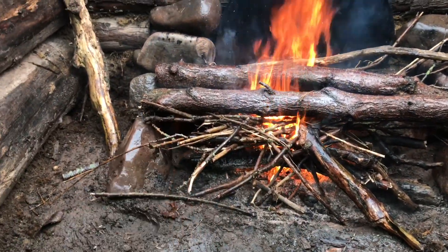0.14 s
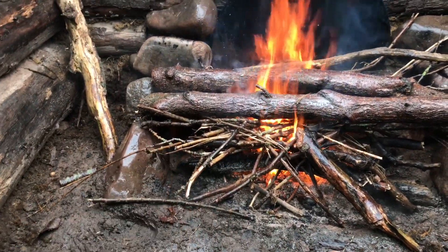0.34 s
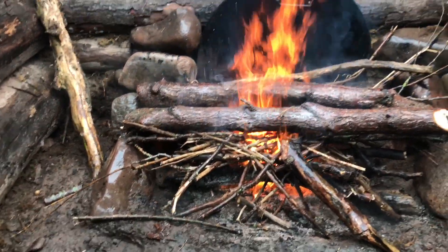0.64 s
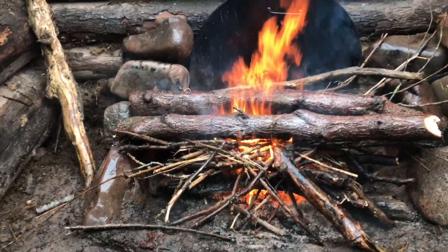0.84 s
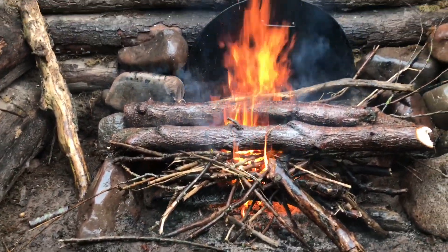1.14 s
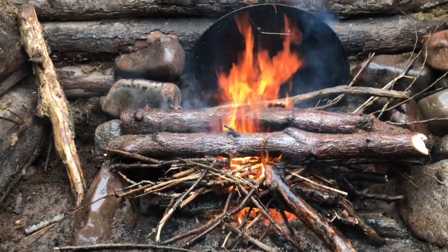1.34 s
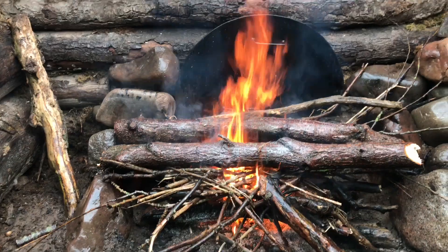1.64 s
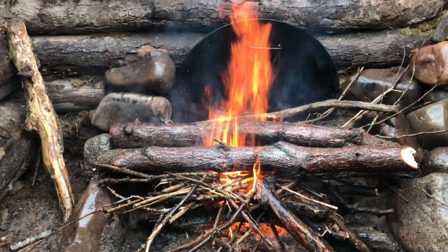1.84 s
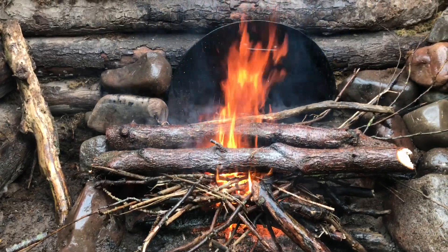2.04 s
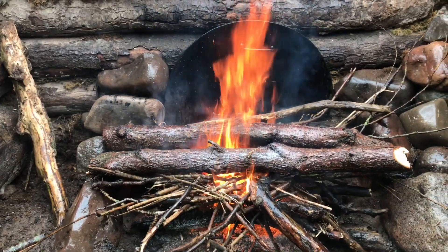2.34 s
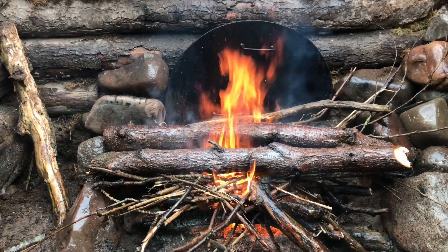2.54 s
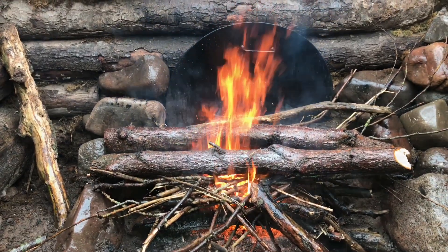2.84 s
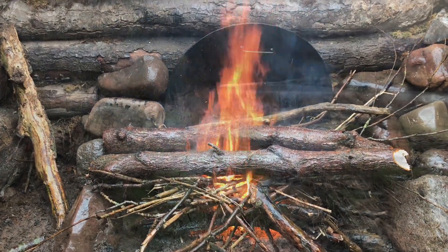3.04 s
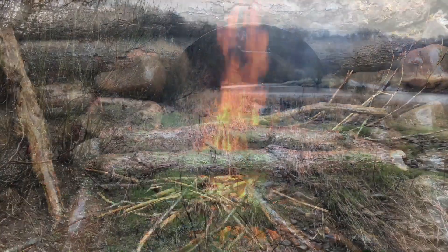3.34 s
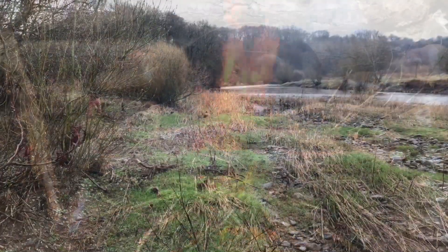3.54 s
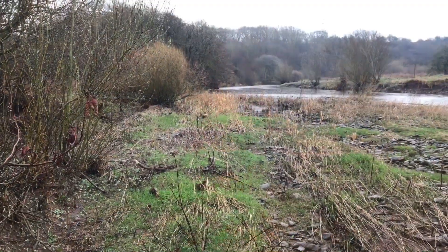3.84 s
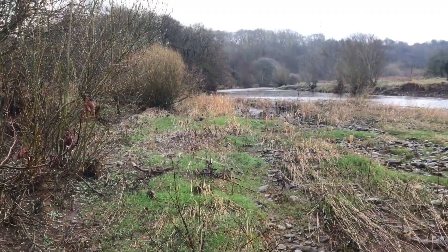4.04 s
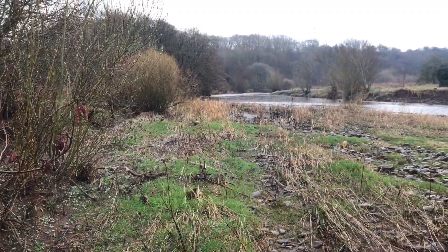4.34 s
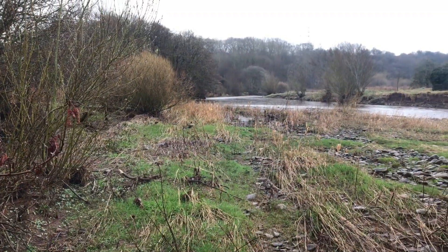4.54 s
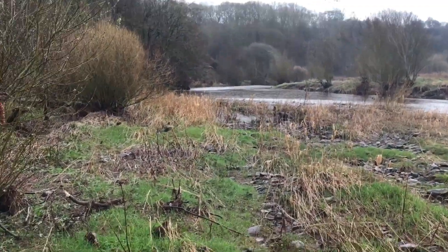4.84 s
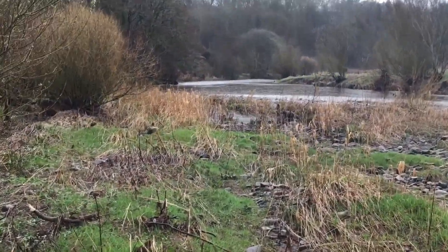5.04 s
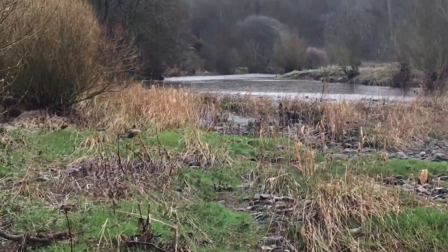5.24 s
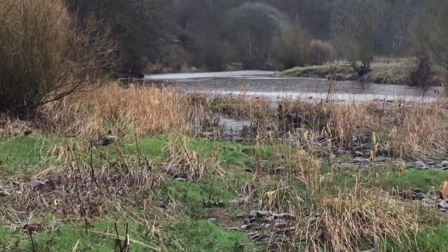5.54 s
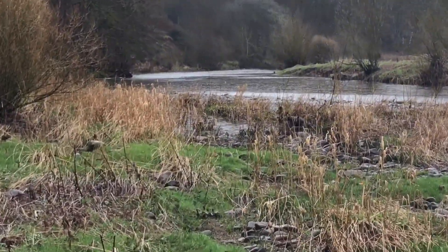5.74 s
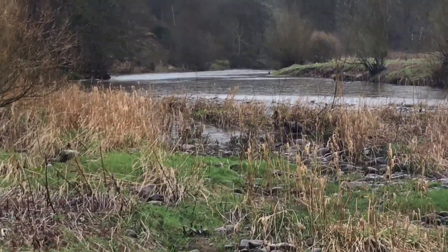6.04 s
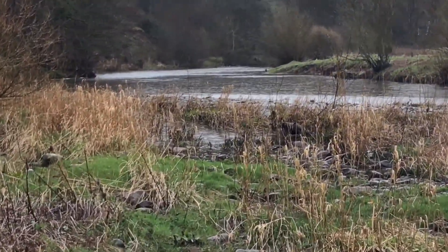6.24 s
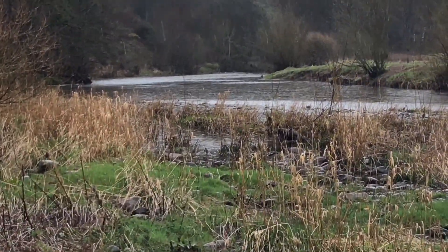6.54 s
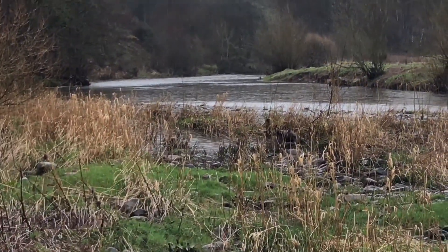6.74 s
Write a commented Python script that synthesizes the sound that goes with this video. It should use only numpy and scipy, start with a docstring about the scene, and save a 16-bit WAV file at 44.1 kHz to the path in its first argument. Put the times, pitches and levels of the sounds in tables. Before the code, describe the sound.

Dense tarp patter and sharp campfire pops over a low flame rumble, melting into a quiet river bank with soft ticking drops and thin birdsong.

```python
"""Rain taps on a tarp close overhead, over a camp fire: wet twigs pop and crackle and the flames rumble.
Drops are short falling chirps with a low thump, pops are ringing cracks with noisy tails; patter and flames
are shaped noise, and a far hum wavers as a sine. The camp then fades over to an open river bank: faint rain
hiss, single drops ticking near the microphone (short rings) and a thin bird song (gliding sines)."""
import sys
import numpy as np
from scipy import signal
from scipy.io import wavfile
from scipy.ndimage import uniform_filter1d

SR = 44100
rng = np.random.default_rng(int(sys.argv[2]) if len(sys.argv) > 2 else 0)


def makeup_ratio(level_db):
    """Linear amplitude ratio for a level in decibels (20 dB per factor of ten)."""
    decades = np.asarray(level_db, float) / 20
    return 10 ** decades


def store_wav(level_fs):
    """Save 16-bit WAV to argv[1]."""
    pcm = np.round(np.clip(np.atleast_2d(level_fs), -1, 1) * 32767)
    wavfile.write(sys.argv[1], SR, pcm.T.astype(np.int16))


N = 304290

# larger drops on the tarp: start_s, ripple_peak_db, thump_db (against the ripple), ripple_pitch_khz
TARP_DROPS = [(0.1119, -21, -38, 1.7), (0.123, -36, -23, 1.6), (0.1517, -23.5, -9, 1.66),
              (0.236, -25.5, -23, 1.7), (0.2572, -18.5, -13.5, 1.16), (0.3272, -19, -9, 1.5),
              (0.4607, -21.5, -4.5, 1.65), (0.489, -25.5, -14, 2.0), (0.5321, -22.5, -29, 1.4),
              (0.6146, -25, -20, 2.2), (0.6835, -15, -5, 1.6), (0.7903, -22, -10.5, 1.45),
              (0.837, -23, -24, 1.27), (0.8894, -25.5, -22, 1.2), (0.9064, -31, -10, 1.2),
              (0.9647, -24.5, -21, 1.67), (1.0087, -26, -10, 1.64), (1.032, -25, -4.5, 1.14),
              (1.0556, -24, -13, 0.91), (1.101, -24.5, -4.5, 0.94), (1.2179, -24.5, -25, 1.33),
              (1.2573, -24, -29, 1.38), (1.2949, -18.5, -17, 1.46), (1.3493, -25, -14, 2.3),
              (1.3407, -25.5, -17, 1.21), (1.41, -31.5, -23, 1.2), (1.523, -23, -17, 1.4),
              (1.5413, -22.5, -18, 1.36), (1.5578, -20, -17, 1.57), (1.6582, -24.5, -24, 1.37),
              (1.7359, -24, -3, 2.3), (1.8053, -25, -16, 2.1), (1.8625, -23, -12, 1.93),
              (1.9911, -25.5, -23, 1.2), (2.0468, -25, -11, 2.2), (2.103, -16, -9.5, 1.47),
              (2.1404, -24.5, -14, 1.86), (2.1742, -26, -17, 1.4), (2.1892, -31, -4, 1.5),
              (2.3585, -23, -18, 1.9), (2.392, -28.5, -18, 1.54), (2.4302, -23, -21, 1.474),
              (2.6122, -29, -12, 1.3), (2.648, -26, -16, 1.44), (2.678, -24.5, -4.5, 1.53),
              (2.6982, -28, -12, 1.48), (2.792, -24, -12.5, 1.95), (2.8495, -21.5, -17, 1.14),
              (2.9068, -22, -13, 1.52), (2.9256, -25, -20, 1.3), (2.9692, -27, -27, 1.8),
              (3.0411, -27, -22, 1.35), (3.0832, -26, -9.5, 1.2), (3.228, -34, -18, 1.1),
              (3.2809, -30, -24, 1.33), (3.3031, -20.5, -8.5, 1.53), (3.3228, -41, -11, 1.14),
              (3.3464, -29.5, -26, 1.34), (3.4923, -34, -12, 0.93), (3.6182, -34.5, -5, 0.97),
              (3.6882, -37, -22, 1.55), (3.71, -37.5, -14, 1.6)]
# camp loudness that its layers are set against, fading out: time_s, level_db
CAMP_LEVEL = [(0.0, -45.5), (2.79, -45), (3.3, -51.5), (3.73, -59), (3.85, -70.5)]
# spectrum of the far rain at the camp: frequency_hz, relative_density_db
PATTER_SPECTRUM = [(60, -21), (110, 3), (240, -16), (365, -16), (500, -15), (1230, -10), (2500, -14.5),
                   (3900, -15.5), (4900, -20), (6000, -17.5), (9300, -21), (10500, -29.5), (13500, -35),
                   (15000, -35.5), (16200, -46)]
# spectrum of the flame rumble: frequency_hz, relative_density_db
FLAME_SPECTRUM = [(16, -46), (28, -18), (45, 0.5), (65, 9.5), (92, -6.5), (124, 0.5), (145, -3), (200, -15),
                  (260, -47), (440, -120)]
# spectrum of pops and crackle: frequency_hz, relative_density_db
POP_SPECTRUM = [(880, -25.5), (1500, -15), (1810, -26.5), (2100, -5.5), (2720, -7.5), (3730, -1.5),
                (4830, -5.5), (5540, 1.5), (8160, 1.5), (10500, -3.5), (14900, -9.5), (16000, -6.5)]
# pops of the twigs: start_s, peak_db, second_crack_db (against the first), second_delay_ms, crack_pitch_khz
TWIG_POPS = [(0.01, -20, -10, 1.0, 8.7), (0.1288, -32, -2, 1.0, 9.9), (0.2153, -20.5, -12, 1.9, 8.6),
             (0.3286, -25.5, -11, 1.2, 5.8), (0.6834, -17, -9, 1.4, 6.5), (0.7192, -23, 7, 1.9, 8.5),
             (0.79, -26.5, -2, 1.0, 7.5), (0.8323, -28, -9, 4.3, 4.3), (0.9829, -4, -1, 2.0, 8.8),
             (1.101, -30, -16, 3.7, 5.5), (1.2562, -33, -15, 1.3, 6.8), (1.349, -19.5, -7, 2.4, 10.8),
             (1.509, -27, -11, 1.7, 13), (1.524, -27, -4, 4.1, 5.1), (1.6212, -19.5, 3.5, 2.4, 8.9),
             (1.7774, -24.5, -2.5, 1.0, 9), (2.028, -18.5, -0.5, 2.0, 9.2), (2.1021, -19.5, 0, 1.7, 6.9),
             (2.3472, -7.5, 1.5, 1.8, 10.7), (2.612, -25.5, -8, 1.9, 6.2), (2.6808, -29.5, -4, 4.5, 6.3),
             (2.7319, -29, -5, 1.2, 4.4), (2.8491, -31, -10, 1.8, 3.2), (2.9347, -3.5, -8, 2.4, 9.6),
             (3.085, -30, -15, 1.0, 4.1), (3.2466, -5.5, 2, 1.3, 8.43), (3.395, -38, 5, 2.5, 7),
             (3.446, -11, 1, 1.3, 8.9), (3.4875, -38, -6, 1.0, 5), (3.5385, -24, -13, 1.7, 9.2)]
# far hum: time_s, pitch_hz, level_db
HUM_CURVE = [(1.05, 117.8, -62), (1.4, 120, -47), (1.94, 119.2, -54.5), (2.2, 117.9, -52.5),
             (2.67, 118.4, -43.5), (2.8, 117, -64)]
# bank loudness, fading in: time_s, level_db
BANK_LEVEL = [(2.9, -87), (3.2, -86), (3.55, -59), (3.8, -54), (6.9, -54)]
# spectrum of the wide rain hiss at the bank: frequency_hz, relative_density_db
BANK_SPECTRUM = [(16, -56), (28, -27.5), (53, 2), (77, 0), (131, -11.5), (234, -16.5), (578, -17.5),
                 (1910, -28), (3170, -28), (4970, -33), (5990, -30), (8460, -30), (10500, -40),
                 (14800, -40.5), (16000, -47)]
# drops near the microphone on the bank: start_s, peak_db, ring_pitch_khz
NEAR_DROPS = [(3.8656, -50, 3.0), (3.941, -54, 7), (4.078, -47, 4.2), (4.112, -48, 2.5), (4.126, -45, 3.4),
              (4.1454, -44, 8.3), (4.199, -52, 9.1), (4.2901, -47, 6.8), (4.3888, -46, 6.5),
              (4.4242, -37.5, 3.3), (4.468, -46, 3.3), (4.4949, -47, 4.6), (4.5247, -44, 4),
              (4.7, -48, 1.5), (4.762, -44, 2.5), (4.799, -42, 8), (4.8617, -40.5, 1.28),
              (4.969, -46, 1.55), (4.975, -41, 4.3), (5.007, -49, 4.6), (5.0185, -46, 5.8),
              (5.141, -49, 2.4), (5.4884, -48, 1.4), (5.773, -43, 3.8), (5.8681, -46, 3.9),
              (6.102, -42.5, 4.2), (6.1518, -46, 6.3), (6.175, -45, 8), (6.3059, -45, 6.5),
              (6.3835, -45, 8.1), (6.4165, -49, 2.5), (6.626, -43, 5.5), (6.7662, -38, 3),
              (6.7974, -39.5, 2.3)]
# notes of the bird: start_s, length_s, first_pitch_hz, last_pitch_hz, level_db
BIRD_NOTES = [(3.68, 0.083, 7200, 7550, -67), (3.74, 0.045, 7100, 7090, -70),
              (3.762, .022, 5500, 4400, -69), (3.795, .04, 4850, 4630, -71), (4.01, 0.19, 7100, 6980, -69),
              (4.105, 0.033, 6800, 4280, -66), (4.14, 0.047, 3550, 3400, -68),
              (4.197, .022, 7050, 7450, -71), (4.208, 0.095, 7480, 7500, -64),
              (4.455, .018, 4900, 3600, -69), (4.345, 0.16, 7200, 7270, -68), (4.54, .05, 5200, 5150, -79)]

# middling tarp drops at random: centre above the camp level, spread either way, thump against the ripple
MIDDLING_COUNT, MIDDLING_DB, MIDDLING_SPREAD_DB = 46, 15, 4
MIDDLING_THUMP_DB, MIDDLING_KHZ = -11.5, 1.393
# middle of the thump scale (a thump starts at 0.875 of its scale), log spread from spot to spot
THUMP_SCALE_HZ, THUMP_SPREAD = 399, 0.12
FLAMES_DB = 2.04  # against the camp level
# tail of a pop against its first crack, and its rise per dB of the second crack
TAIL_DB, TAIL_DB_PER_SECOND_DB = -17, 0.57
# knock of the log against the louder crack
KNOCK_DB, KNOCK_KHZ, KNOCK_DELAY_S = -15, 3.66, 0.00049
# small ticks at random: lowest peak against the bank level, pitch range
SMALL_COUNT, SMALL_DB, SMALL_LOW_KHZ, SMALL_HIGH_KHZ = 70, 0, 2.8, 9.8
# ring decay of a tick in cycles but no shorter than the least, onset time, snap against the ring
RING_CYCLES, RING_LEAST_MS, SOFT_MS, SNAP_DB = 1.24, 0.31, 0.06, -3.5
WAVER_HZ, WAVER_DB = 25, 1.5  # unsteadiness of the bird notes
OVERLOAD, EDGE_HZ = 0.8, 15900  # peak ceiling in full scale, upper band limit


def evened(x):
    """Scales to rms 1."""
    return x / np.sqrt(np.mean(x ** 2) + 1e-20)


def peaked(x):
    """Scales to peak 1."""
    return x / np.max(abs(x))


def camp_level():
    """Camp level in dB at every sample, all but silent past the end of its curve."""
    time_s, level_db = np.transpose(CAMP_LEVEL)
    return np.interp(np.arange(N) / SR, time_s, level_db, right=-150)


def add(mix, start_s, sound):
    """Mixes a sound in at start_s."""
    part = mix[max(round(start_s * SR), 0):][:len(sound)]
    part += sound[:len(part)]


def falls(per_s, spread_db, clumpy):
    """A sparse train of random hits that come in clumps; a few are large."""
    clumps = np.exp(clumpy * evened(uniform_filter1d(rng.standard_normal(N), size=1500)))
    hit = rng.random(N) < per_s / SR * clumps / clumps.mean()
    return makeup_ratio(spread_db * np.minimum(rng.exponential(1, N), 3)) * hit


def ripple(khz, glide_ms, fade_ms):
    """A struck sheet sends its treble first: a short chirp that falls through the given pitch."""
    ms = np.arange(900) / SR * 1000
    turns = 2.316 * khz * glide_ms * np.log(1 + ms / glide_ms)
    return peaked(-np.sin(2 * np.pi * turns) * np.exp(-ms / fade_ms))


def shower(per_s, spread_db, low_hz, high_hz, glide_ms, fade_ms):
    """Random drops, each a ripple at one of twelve pitches; a few are large."""
    size = falls(per_s, spread_db, clumpy=0.6)
    kind = rng.integers(0, 12, N)
    pitches = np.geomspace(low_hz, high_hz, 12) / 1000
    return evened(sum(signal.oaconvolve(size * (kind == k), ripple(khz, glide_ms, fade_ms))[:N]
                      for k, khz in enumerate(pitches)))


def shelter(x, t60, first_ms):
    """Surroundings answer with sparse, decaying echoes of random sign; three sets take turns."""
    t, out = np.arange(N) / SR, np.zeros(N)
    for k in range(3):
        taps = np.zeros(6000)
        at = np.arange(0, 5980, 20) + rng.integers(0, 20, 299)
        late = at > first_ms * SR / 1000
        taps[at] = rng.standard_normal(299) * makeup_ratio(-60 * at / SR / t60) * late
        turn = np.cos(np.pi * (t * 7 + k / 3)) * np.sqrt(2 / 3)
        out += signal.oaconvolve(x * turn, taps / np.linalg.norm(taps))[:N]
    return out


def middling_drops():
    """Random tarp drops that follow the camp level, in the columns of TARP_DROPS."""
    when, size, low, pitch = rng.random((MIDDLING_COUNT, 4)).T
    start_s = when * CAMP_LEVEL[-1][0]
    peak_db = np.interp(start_s, *np.transpose(CAMP_LEVEL)) + MIDDLING_DB
    peak_db += MIDDLING_SPREAD_DB * (2 * size - 1)
    thump_db = MIDDLING_THUMP_DB + 5 * (2 * low - 1)
    return np.c_[start_s, peak_db, thump_db, MIDDLING_KHZ * (0.8 + 0.4 * pitch)]


def tarp():
    """Large drops overhead, each a ripple and the low thump of the sheet, over a shower of small ones."""
    small = shower(600, 4.7, 460, 3070, glide_ms=0.45, fade_ms=0.61)
    mix = makeup_ratio(camp_level() - 9.5) * small
    drops, t = np.r_[TARP_DROPS, middling_drops()], np.arange(1500) / SR
    spots = THUMP_SCALE_HZ * np.exp(THUMP_SPREAD * rng.standard_normal(len(drops)))
    sag = 0.028 * np.log(1 + t / 0.032)  # the pitch sinks as the sheet slackens
    for (start_s, peak_db, thump_db, khz), hz in zip(drops, spots):
        swell = 1 - np.exp(-t / 0.0005)
        thump = peaked(-np.sin(2 * np.pi * hz * sag) * np.exp(-t * hz / 0.61) * swell)
        add(mix, start_s, makeup_ratio(peak_db) * ripple(khz, glide_ms=0.32, fade_ms=0.99))
        add(mix, start_s, makeup_ratio(peak_db + thump_db) * thump)
    return mix + makeup_ratio(-3.5) * shelter(mix, t60=0.087, first_ms=0.73)


def hiss(spectrum, size, patchy_db, flicker_db):
    """Random short-time spectra with drifting patches and a flicker shared by all bands."""
    frames, hz = 4 * N // size + 5, np.fft.rfftfreq(size, 1 / SR)
    real, imaginary, patches = rng.standard_normal((frames, len(hz), 3)).T
    patches = uniform_filter1d(patches, size=9, axis=0)  # across frequency
    patches = evened(uniform_filter1d(patches, size=8, axis=1))  # across time
    flicker = evened(uniform_filter1d(rng.standard_normal(frames), size=4))
    point_hz, point_db = np.transpose(spectrum)
    shape_db = np.interp(np.log(hz + 1), np.log(point_hz), point_db)[:, None]
    z = (real + 1j * imaginary) * makeup_ratio(shape_db + patchy_db * patches + flicker_db * flicker)
    return evened(signal.istft(z, nperseg=size, noverlap=3 * size // 4)[1][:N])


def colour(spectrum, size):
    """Causal (minimum-phase) impulse response with the given spectrum."""
    point_hz, point_db = np.transpose(spectrum)
    hz = abs(np.fft.fftfreq(8192, 1 / SR))
    gain = makeup_ratio(np.interp(np.log(hz + 1), np.log(point_hz), point_db))
    log_gain = np.log(gain + 1e-5)
    return np.fft.ifft(np.exp(np.conj(signal.hilbert(log_gain)))).real[:size]


def grains(spectrum, per_s, spread_db, t60, tail_db):
    """Random single clicks of the given colour; each of 16 kinds drags its own short noisy tail."""
    size = falls(per_s, spread_db, clumpy=0.55)
    kind, t = rng.integers(0, 16, N), np.arange(3000) / SR
    tails = rng.standard_normal((16, len(t))) * makeup_ratio(-60 * t / t60)
    tails *= makeup_ratio(tail_db) / np.linalg.norm(tails, axis=1, keepdims=True)
    tails[:, 0] = 1  # the click itself
    hits = sum(signal.oaconvolve(size * (kind == k), tail)[:N] for k, tail in enumerate(tails))
    return evened(signal.oaconvolve(hits, colour(spectrum, size=2048))[:N])


def patter():
    """Far rain at the camp: a flickering hiss and a dense fall of single drops."""
    wash = makeup_ratio(camp_level() - 1.5) * hiss(PATTER_SPECTRUM, size=512, patchy_db=1.0, flicker_db=4)
    drops = grains(PATTER_SPECTRUM, 400, spread_db=4.5, t60=0.041, tail_db=4)
    return wash + makeup_ratio(camp_level() - 0.5) * drops


def flames():
    """Low, unsteady noise as the rumble of the flames."""
    rumble = hiss(FLAME_SPECTRUM, size=4096, patchy_db=-0.4, flicker_db=3.0)
    return makeup_ratio(camp_level() + FLAMES_DB) * rumble


def crackle():
    """Small random ticks of the fire with a short hissing tail."""
    ticks = grains(POP_SPECTRUM, 120, spread_db=3, t60=0.038, tail_db=3)
    return makeup_ratio(camp_level() - 17) * ticks


def twigs():
    """Steam bursts the wood in one or two cracks; the stones around throw back a hissing tail."""
    body, t = colour(POP_SPECTRUM, size=400), np.arange(6000) / SR
    mix, noise = np.zeros(N), rng.standard_normal((len(TWIG_POPS), len(t)))
    ms = 1000 * t[:400]
    rise = 1 - np.exp(-t / 0.001)
    for (start_s, peak_db, second_db, delay_ms, khz), puff in zip(TWIG_POPS, noise):
        ring = np.sin(2 * np.pi * khz * ms) * ms * np.exp(-ms * khz / 0.85)
        crack = peaked(peaked(ring) + makeup_ratio(1.5) * peaked(body))
        add(mix, start_s, -makeup_ratio(peak_db) * crack)
        # the second crack is a ragged cluster of splinters, begun 0.3 ms ahead of its delay
        splinters = signal.oaconvolve(puff[-400:] * np.exp(-ms / 1.9), crack + 0.83 * peaked(body))
        add(mix, start_s + delay_ms / 1000 - 0.0003, makeup_ratio(peak_db + second_db) * peaked(splinters))
        # uneven echoes: a wide quick part, and a longer part that keeps the pitch of the crack
        puff = puff * makeup_ratio(2.5 * evened(uniform_filter1d(puff[::-1], size=40)))
        quick = evened(signal.oaconvolve(puff, body)[:len(t)]) * makeup_ratio(-60 * t / 0.032)
        slow = evened(signal.oaconvolve(puff, crack)[:len(t)]) * makeup_ratio(-3 - 60 * t / 0.1)
        tail_db = peak_db + TAIL_DB + TAIL_DB_PER_SECOND_DB * second_db
        add(mix, start_s, makeup_ratio(tail_db) * rise * (quick + slow))
        # each pop also knocks the log
        knock_db = peak_db + max(second_db, 0) + KNOCK_DB
        add(mix, start_s + KNOCK_DELAY_S, makeup_ratio(knock_db) * ripple(KNOCK_KHZ, glide_ms=0.65, fade_ms=1.0))
    return mix


def tone(curve, taper):
    """A sine that follows a pitch and rms level curve; returns its start_s and its sound."""
    time_s, pitch_hz, level_db = np.transpose(curve)
    t = np.arange(time_s[0], time_s[-1], 1 / SR)
    wave = np.sqrt(2) * np.sin(2 * np.pi * np.cumsum(np.interp(t, time_s, pitch_hz)) / SR)
    fades = signal.windows.tukey(len(t), taper)
    return time_s[0], wave * makeup_ratio(np.interp(t, time_s, level_db)) * fades


def hum():
    """A far low sine that wavers in pitch and level."""
    mix = np.zeros(N)
    add(mix, *tone(HUM_CURVE, taper=0.075))
    return mix


def bank_rain():
    """Wide hiss of rain on grass and water, with fine drops in it."""
    mix = hiss(BANK_SPECTRUM, size=2048, patchy_db=1.13, flicker_db=0.2)
    mix += makeup_ratio(-15) * shower(250, 4.3, 635, 4320, glide_ms=0.66, fade_ms=0.81)
    return mix * makeup_ratio(np.interp(np.arange(N) / SR, *np.transpose(BANK_LEVEL), left=-150))


def tick(khz):
    """A drop on a leaf or stone: a falling snap and a short ring with a soft start."""
    ms = np.arange(600) / SR * 1000
    fade_ms = max(RING_CYCLES / khz, RING_LEAST_MS)
    ring = peaked(-np.sin(2 * np.pi * khz * ms) * np.exp(-ms / fade_ms))
    snap = makeup_ratio(SNAP_DB) * ripple(3.0, glide_ms=0.3, fade_ms=0.18)[:len(ms)]
    return peaked((ring + snap) * (1 - np.exp(-ms / SOFT_MS)))


def near_drops():
    """Ticks near the microphone, with smaller ones at random, and their brief sparse echoes."""
    near = np.zeros(N)
    when, size, pitch = rng.random((SMALL_COUNT, 3)).T
    first_s = BANK_LEVEL[1][0]
    start_s = first_s + when * (N / SR - first_s)
    peak_db = np.interp(start_s, *np.transpose(BANK_LEVEL)) + SMALL_DB + 6 * size
    small = np.c_[start_s, peak_db, SMALL_LOW_KHZ * (SMALL_HIGH_KHZ / SMALL_LOW_KHZ) ** pitch]
    for start_s, peak_db, khz in np.r_[NEAR_DROPS, small]:
        add(near, start_s, makeup_ratio(peak_db) * tick(khz))
    return near + makeup_ratio(-5.5) * shelter(near, t60=0.03, first_ms=3.0)


def bird():
    """Thin gliding whistles that swell, waver and die away."""
    mix = np.zeros(N)
    for start_s, length_s, first_hz, last_hz, level_db in BIRD_NOTES:
        along = np.linspace(0, 1, 12)
        drift, flutter = rng.standard_normal((len(along), 2)).T
        pitch_hz = first_hz + (last_hz - first_hz) * along + WAVER_HZ * drift
        curve = np.c_[start_s + length_s * along, pitch_hz, level_db + WAVER_DB * flutter]
        add(mix, *tone(curve, taper=0.5))
    return mix


def scene():
    """Camp, then river bank, in one channel."""
    camp = tarp() + patter() + flames() + crackle() + twigs() + hum()
    river_bank = bank_rain() + near_drops() + bird()
    return (camp + river_bank)[None]


def low_pass(x):
    """Removes everything above the highest recorded frequency."""
    return signal.sosfilt(signal.butter(12, 17000, fs=SR, output="sos"), x)


def record(dry):
    """The microphone rolls off the deep bass and rounds the loudest peaks; a filter limits the band."""
    rolled = signal.lfilter(*signal.butter(4, 34, "high", fs=SR), dry)
    rounded = rolled / (1 + (abs(rolled) / OVERLOAD) ** 4) ** 0.25
    edge = signal.firwin(511, EDGE_HZ, window=("kaiser", 9), fs=SR)
    finished = signal.oaconvolve(rounded, edge[None], "same")
    return low_pass(finished)


dry = scene()
out = record(dry)
store_wav(out)
```